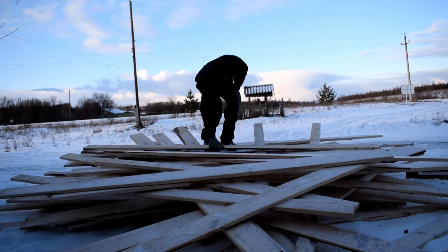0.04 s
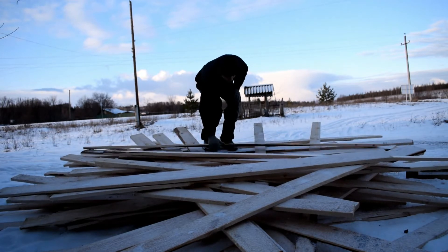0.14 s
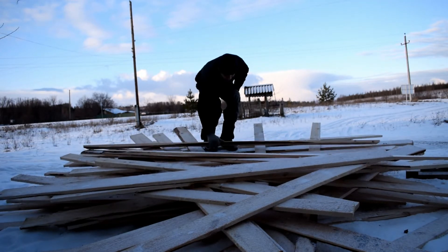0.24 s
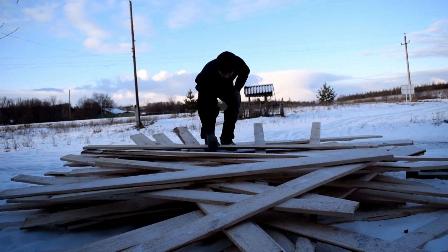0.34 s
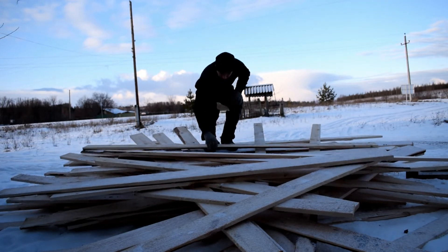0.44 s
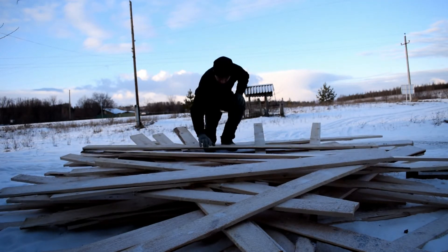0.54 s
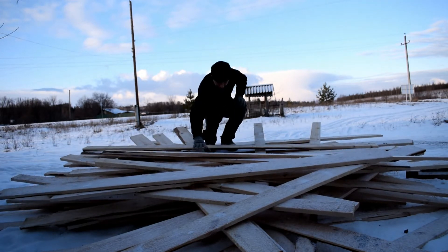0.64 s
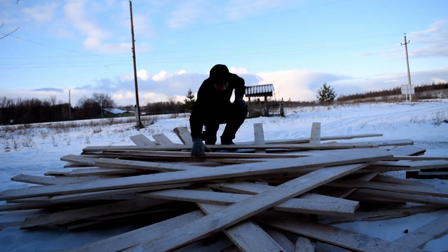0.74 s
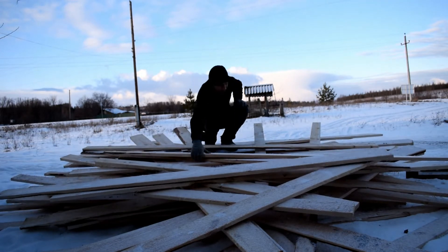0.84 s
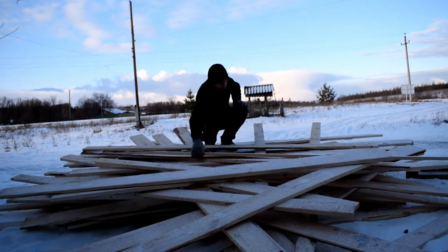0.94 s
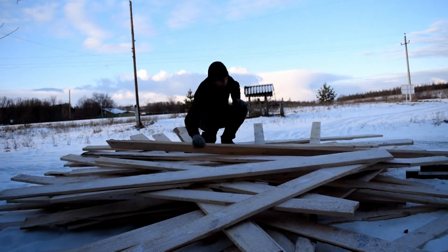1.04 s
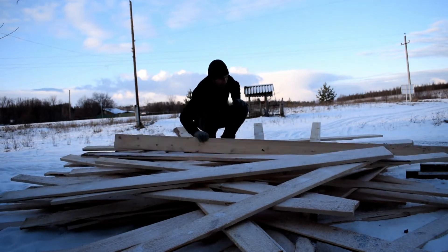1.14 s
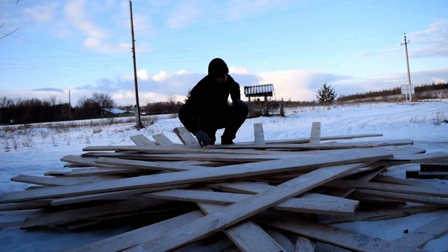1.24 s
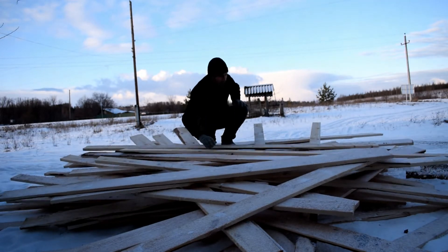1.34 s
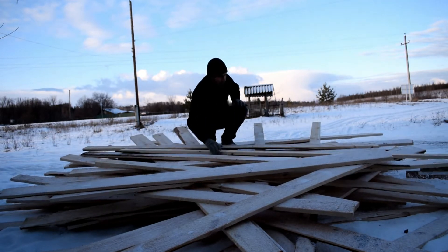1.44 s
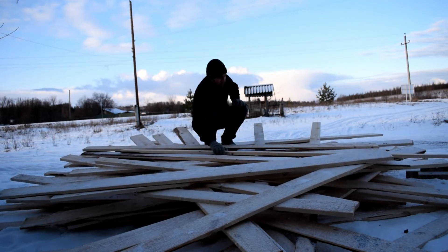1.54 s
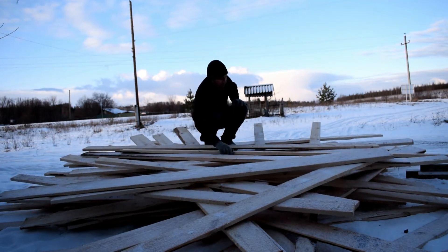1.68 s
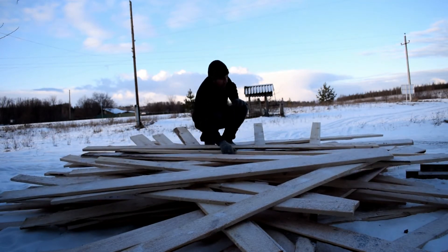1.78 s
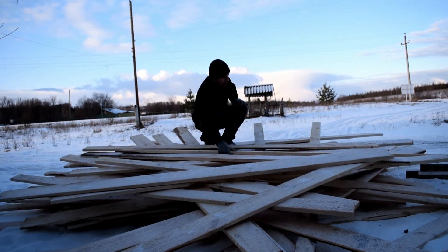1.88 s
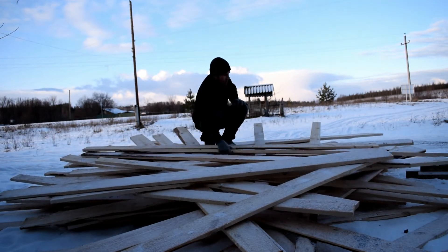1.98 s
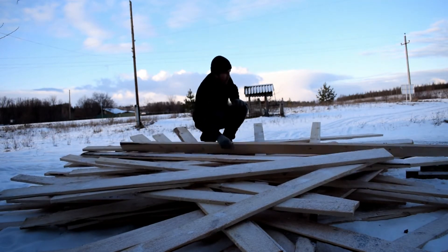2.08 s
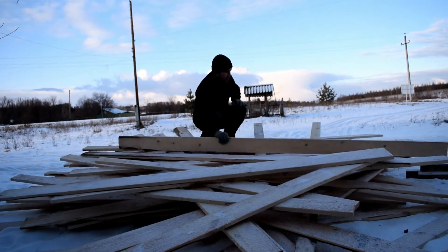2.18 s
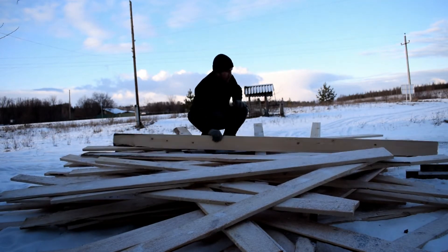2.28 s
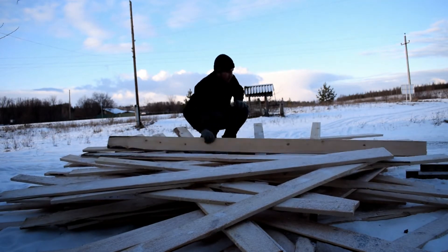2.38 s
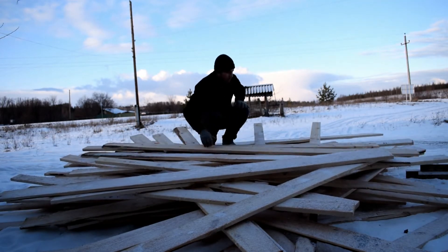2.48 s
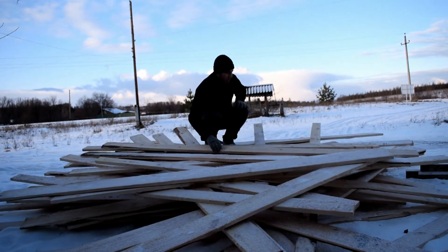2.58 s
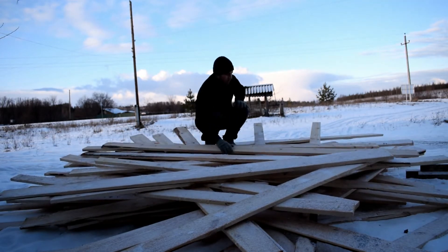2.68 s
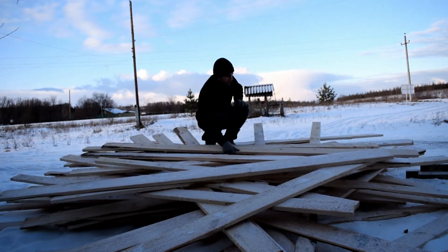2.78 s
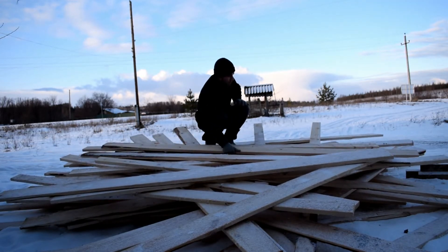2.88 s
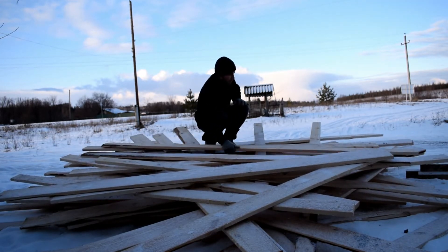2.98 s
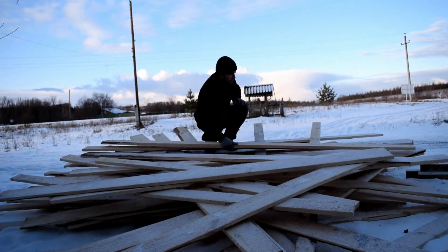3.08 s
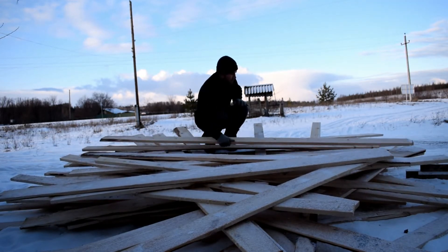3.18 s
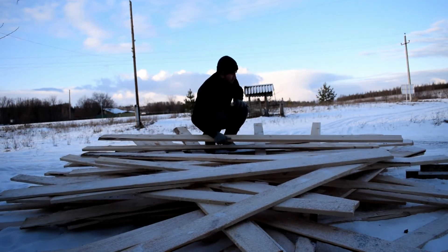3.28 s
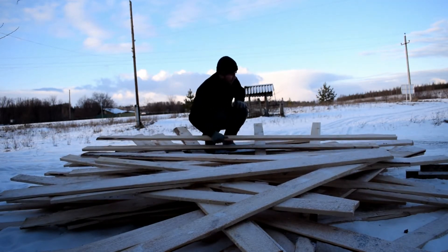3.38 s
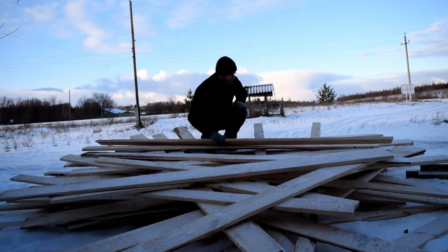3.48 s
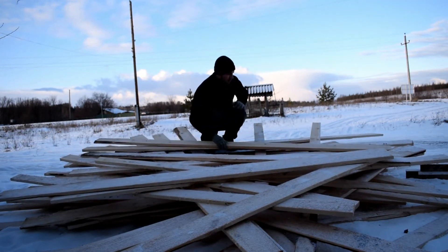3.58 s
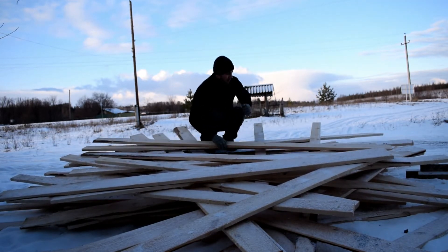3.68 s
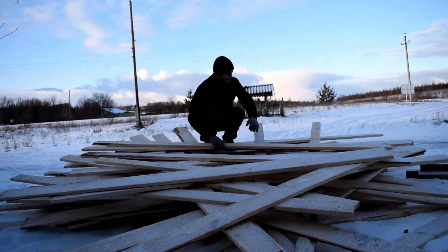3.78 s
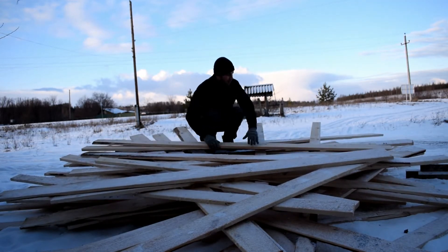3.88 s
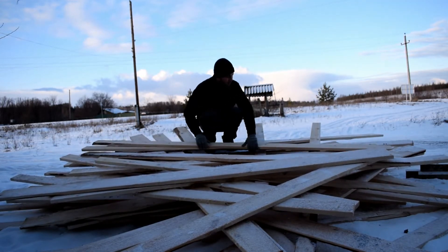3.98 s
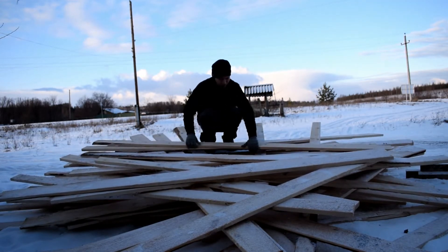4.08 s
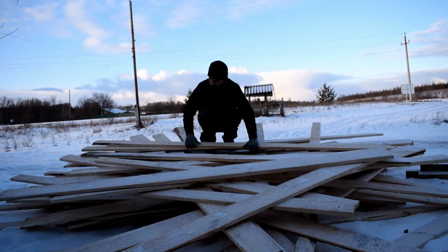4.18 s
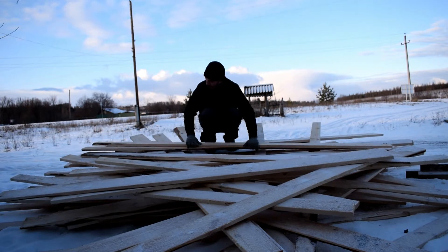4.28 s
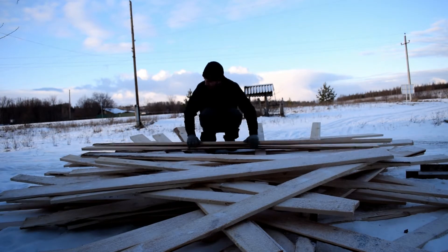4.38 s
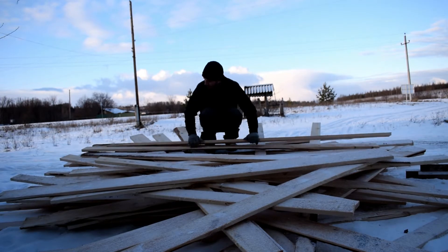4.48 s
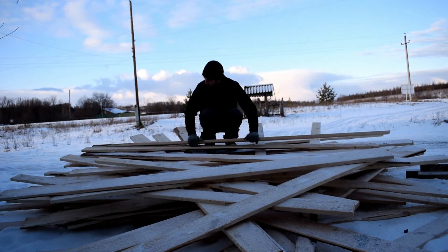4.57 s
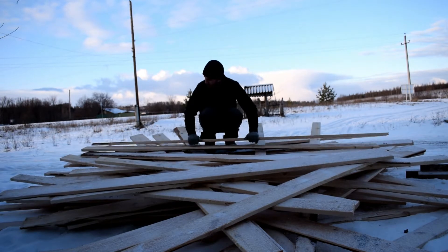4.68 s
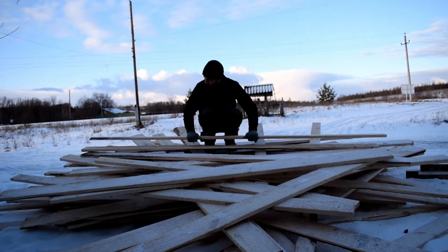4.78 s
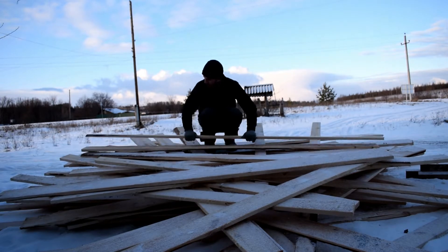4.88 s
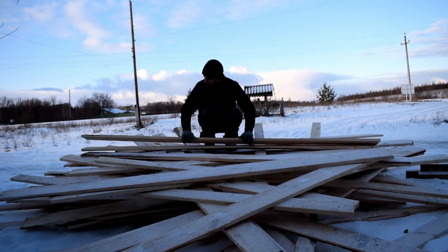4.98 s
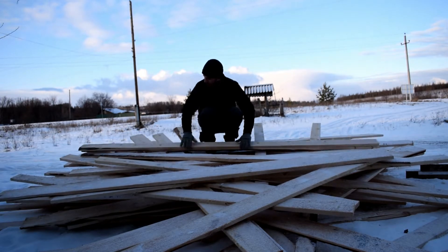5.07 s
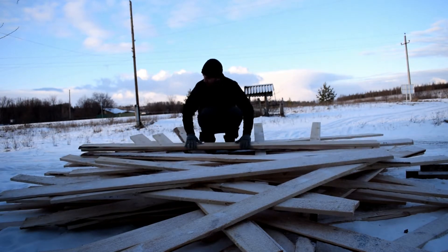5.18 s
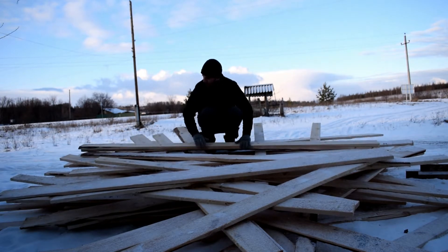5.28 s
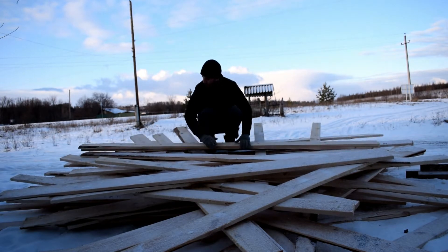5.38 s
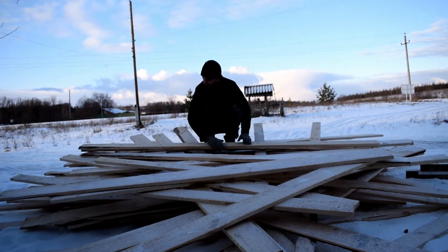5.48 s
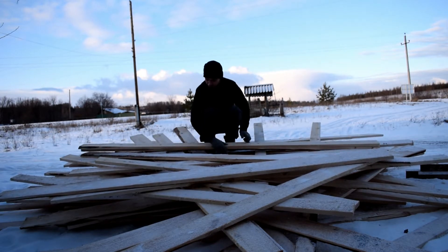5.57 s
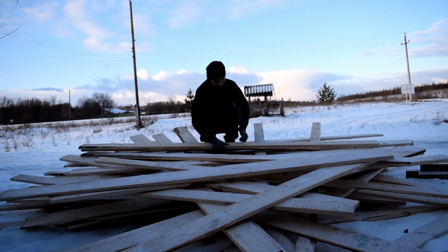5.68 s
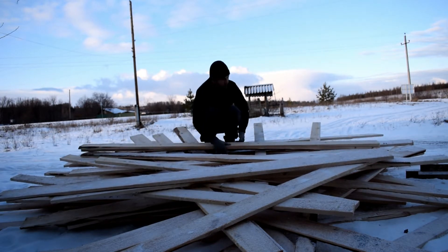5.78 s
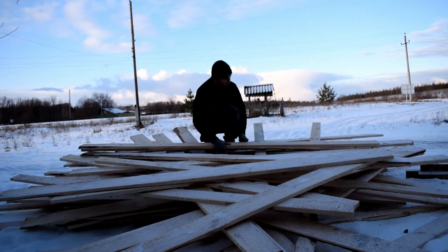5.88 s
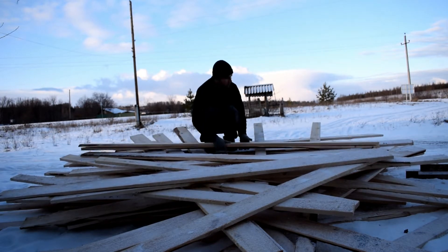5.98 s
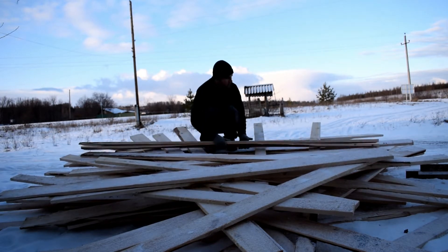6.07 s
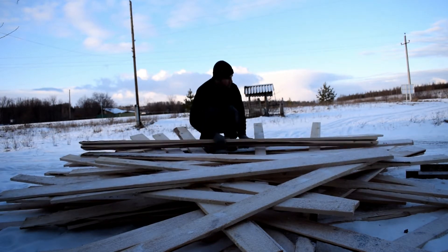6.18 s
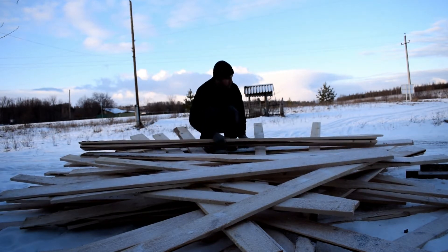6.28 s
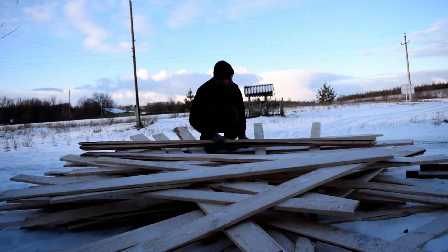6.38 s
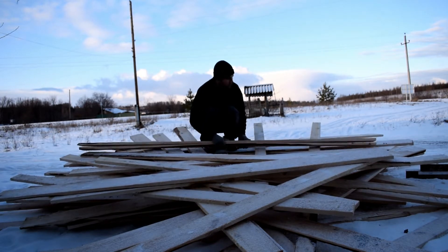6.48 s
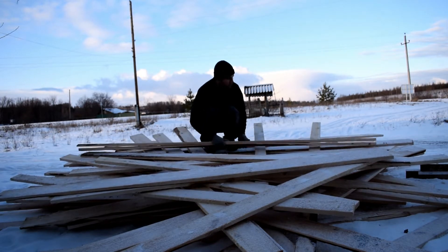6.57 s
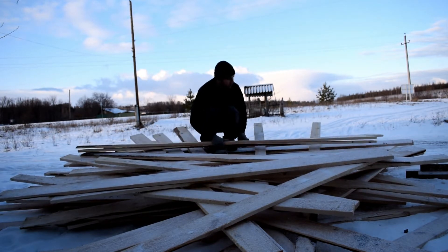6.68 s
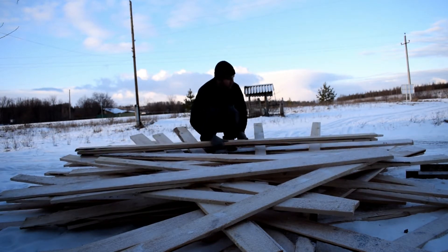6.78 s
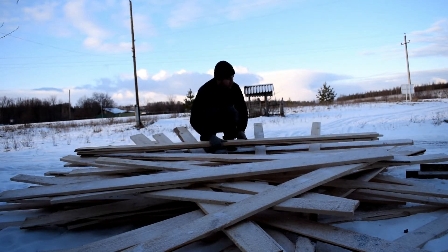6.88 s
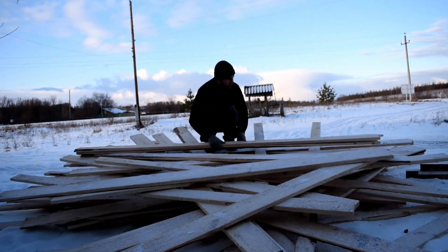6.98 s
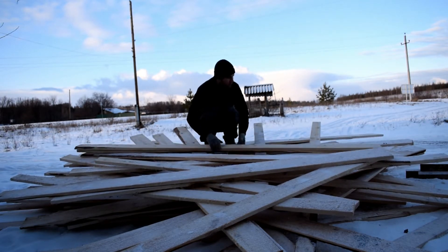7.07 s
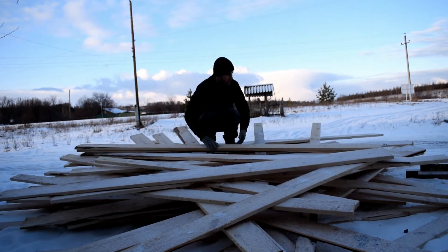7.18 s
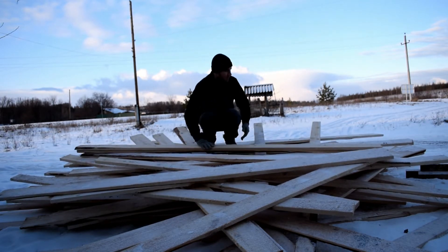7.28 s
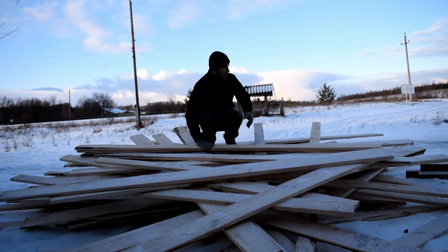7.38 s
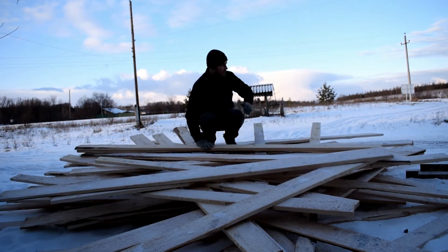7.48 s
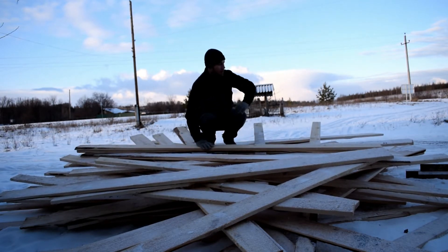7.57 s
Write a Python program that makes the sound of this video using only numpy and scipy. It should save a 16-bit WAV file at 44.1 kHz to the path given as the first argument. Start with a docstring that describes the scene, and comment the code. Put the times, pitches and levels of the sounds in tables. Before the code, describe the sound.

Sawn boards slap hard onto a loose wooden pile outdoors, clattering and rattling after each drop, with wind buffets between and a quiet stretch before the last knock.

```python
"""Sawn boards drop on a loose pile in a snowy yard: each lands, slaps and bounces, and the pile rattles on.
Boards are bursts of random contacts ringing decaying wood modes, with splintery noise for the bright edge.
Dry clicks are noise puffs; a jacket rustle and sifting snow are shaped hiss.
Wind is lumpy low noise with short thumps on the microphone; over the open field hang air hiss, an unsteady
hum and a faint far whine. The loudest slaps clip the recorder."""
import sys
import numpy as np
from scipy import signal
from scipy.fft import rfft, irfft, next_fast_len
from scipy.io import wavfile
from scipy.ndimage import uniform_filter1d, map_coordinates

SR = 44100
rng = np.random.default_rng(int(sys.argv[2]) if len(sys.argv) > 2 else 0)


def to_wav(s):
    """Save 16-bit WAV."""
    ch = np.atleast_2d(s).T  # columns
    pcm = np.round(np.clip(ch, -1, 1) * 32767)  # PCM
    wavfile.write(sys.argv[1], SR, pcm.astype(np.int16))


N = 336924

# Board contacts: start_s, level_db, high_ring_db (upper modes against middle ones),
# crack_db (against the knock), chatter_t60_s (held to 0.01-0.3 s), rise_ms
BOARD_KNOCKS = [(.003, -11.5, -5, -23, 0.11, 1.66), (0.017, -24, 13.5, -22, 0.2, 2.7),
                (.105, -23.5, -10, -32, .1, 3.7), (.16, -26.5, -24, -16, 0.08, 4.5),
                (.2, -27.5, -24, -37, 0.074, 5.6), (.244, -31, -15, -30.5, 0.045, 3),
                (.38, -22.5, -17, -22.5, .24, 6.4), (.416, -11.5, -7, -28, 0.21, 3.2),
                (.463, -14.5, 5.5, -45, .08, 8), (.518, -23.5, -19, -20, .06, 3.7),
                (.553, -16, -5, -26.5, 0.092, 1.9), (.565, -11, -11, -45, 0.14, 4.3),
                (.649, -29, -31, -14, .1, 2.2), (.689, -36, -24, -37, .06, 5),
                (.854, -33.5, -1, -28, .055, 3.9), (.89, -33.5, 8, -10, .055, 3.4),
                (1.024, -18.5, -9, -37, 0.086, 8.6), (1.097, -24, -15.5, -29.5, .06, 10),
                (1.19, -25.5, -4, -23, .11, 11), (1.31, 3, 15, -19, 0.11, 1.9),
                (1.32, 2.5, -0.5, -27.5, 0.025, 2.05), (1.33, -7, -10, -16, .18, 2.2),
                (1.375, -5.5, -3, -41, .08, 3.1), (1.42, -9.5, 3, -23.5, 0.13, 2),
                (1.478, -12, -15, -35, 0.26, 6.3), (1.507, -13.5, -0.5, -42, .06, 3.4),
                (1.518, -6, -10, -39.5, 0.089, 5.1), (1.632, -27.5, -6, -20, .1, 5),
                (1.696, -28.5, -18, -25, .064, 2.2), (1.827, -32, -18, -14, 0.071, 1.8),
                (2.212, -29, -8, -17, .07, 3), (2.417, -4, -9.5, -43.5, 0.13, 1.4),
                (2.541, 2, 12, -22, 0.16, 2.1), (2.557, -1, 5, -22.5, .11, 2.3),
                (2.577, -2, -5, -34.5, .08, 2.46), (2.627, -13, 0, -48.5, 0.12, 6.1),
                (2.728, -18.5, 2.5, -45.5, .1, 2.9), (2.78, -23, -4, -40.5, 0.058, 5),
                (2.814, -22.5, -24, -31, 0.093, 3.5), (2.854, -19, -24, -31, .1, 1.8),
                (2.956, -29.5, -20, -47, 0.14, 2), (3.18, -35, -13, -30, .09, 8),
                (3.538, -6.5, -7, -32.5, .15, 1.1), (3.56, 1.5, 11.5, -23, .1, 2.4),
                (3.597, -8, -8, -19, 0.18, 1.6), (3.614, -9.5, -3, -30.5, .065, 3),
                (3.628, -3.5, 11, -29, .09, 6), (3.654, -9, -8, -57, .08, 2.2),
                (3.672, -9, -7, -34, 0.1, 5.1), (3.704, -16, 4.5, -43, 0.035, 2.6),
                (3.76, -22.5, -16, -37.5, 0.34, 5), (3.788, -20.5, -5, -31.5, 0.34, 6.1),
                (3.836, -14, -5.5, -51, 0.052, 1.95), (4.031, -35.5, 0, -18, .11, 4.5),
                (4.075, -23, -8, -32, .04, 2.1), (4.263, -36.5, -24, -29, 0.07, 3.6),
                (4.434, -35, -12, -17.5, 0.34, 4), (4.469, -21.5, -13.5, -33, 0.13, 3),
                (4.534, -11, -3.5, -27.5, 0.15, 1), (5.023, -11.5, -8, -42, 0.19, 0.92),
                (5.091, -9.5, -20, -22, 0.1, 1), (5.123, 1, -7.5, -27.5, .1, 2.16),
                (5.138, -7, 8, -38, 0.06, 3.8), (5.223, -15.5, -4.5, -41.5, 0.064, 4.5),
                (5.245, -30, -11, -43, 0.054, 3), (5.29, -20, -4, -37.5, 0.053, 1.7),
                (5.347, -22.5, -15, -41, 0.039, 2.9), (5.444, -27, -24, -30, 0.068, 4.8),
                (5.556, -26.5, -10, -21.5, .055, 2.4), (5.689, -31, -13, -39, .053, 2.14),
                (7.109, -11, 7.5, -16.5, 0.07, 3.6), (7.12, -2.5, 2, -29, 0.09, 4.5),
                (7.15, -11, -10.5, -37.5, 0.1, 4.2), (7.243, -24.5, -10, -33, .11, 5),
                (7.262, -30.5, 4, -20, .08, 4), (7.322, -30, -2, -15, 0.13, 6.6),
                (7.52, -38, -14.5, -32, 0.049, 6)]
# Splinter noise colour: freq_hz, density_db (relative, per Hz)
CRACK_COLOUR = [(1180, -21.5), (2000, 4), (4900, -2.5), (6740, -8), (8220, -7.5), (11700, -16),
                (15700, -28)]
BODY_DB, BODY_PER_DB = -3, -0.2252  # low modes of a 0 dB knock; softer knocks sound deeper
FIRST_BLOW, SHARP_MS = 9, 1.385  # knocks that rise more slowly than SHARP_MS get a weaker first blow
DULL_HZ, DULL_S = 1200, 0.065  # later contacts are softer and lose the treble
SNAP_T60_S, GRIT_SHARE, GRIT_LUMP_DB = 0.013, .3, 4


def knocks():
    """A board does not land at once: a first blow, then a chatter of contacts along its length."""
    out = np.zeros(N)
    t = np.arange(SR // 4) / SR
    splinter = unit(hiss(CRACK_COLOUR) * amp(GRIT_LUMP_DB * wobble(250)))
    for s, db, high_db, crack_db, t60, rise_ms in BOARD_KNOCKS:
        fade = amp(-60 * t / np.clip(t60, .01, .3))
        # about 2500 random contacts a second, with a weaker 0.2 s tail under the main fade
        chatter = rng.standard_normal(len(t)) * (rng.random(len(t)) < 2500 / SR)
        contacts = chatter * (fade + .3 * amp(-60 * t / .2))
        contacts *= 1 - np.exp(-1000 * t / max(rise_ms, .3))
        soft = signal.lfilter(*signal.butter(2, DULL_HZ, fs=SR), contacts)
        contacts = soft + (contacts - soft) * np.exp(-t / DULL_S)
        contacts[0] = FIRST_BLOW * min(1, SHARP_MS / max(rise_ms, .3)) ** 2
        sound = signal.fftconvolve(contacts, ring(BODY_DB + BODY_PER_DB * db, high_db))
        opening_rms = np.sqrt(np.mean(sound[:SR // 40] ** 2))
        add(out, s, amp(db) * 0.41 * sound / opening_rms)
        # splinters and grit give the bright edge
        snap = amp(-60 * t / SNAP_T60_S) + GRIT_SHARE * fade
        snap *= 1 - np.exp(-1000 * t / max(rise_ms / 2, .5))
        grit = splinter[rng.integers(N - SR):][:len(t)]
        add(out, s, amp(db + crack_db) * snap * grit)
    # narrow boards radiate little deep bass
    return filtered(out, lambda hz: (1j * hz / (70 + 1j * hz)) ** 2)


# Wood modes: pitch_hz (before a random detune), level_db (relative, before tilt and random spread),
# t60_s (capped shorter, most of all for high modes)
WOOD_MODES = [(99, -15.5, .15), (151, -14, 0.14), (203, -13.5, .1), (281.8, -14, 0.13), (378.6, -5, 0.15),
              (439.7, -5, 0.13), (499, -7.5, 0.062), (546, 2.5, 0.039), (579.2, -3.5, 0.079),
              (682, -10, 0.11), (755.3, -4.5, 0.069), (811.7, -5.5, 0.098), (897, 1.5, 0.071),
              (967.4, -5, 0.042), (1058, 1.5, 0.027), (1252, -1, 0.074), (1394, -5.5, .07),
              (1503, -12, 0.04), (1700, -9.5, 0.048), (1761, -18.5, .06), (1903, -14, 0.081),
              (2051, -13.5, 0.057), (2246, -19, 0.055), (2490, -14, 0.12), (2976, -21, 0.029),
              (3220, -23, 0.034), (3417, -19.5, 0.035), (4083, -34.5, 0.024)]


def ring(low_db, high_db):
    """The wood's answer to one tap: several boards sound at once, each cut and struck a little differently."""
    hz, db, t60 = np.repeat(np.transpose(WOOD_MODES), 4, axis=1)[:, :, None]
    t = np.arange(SR // 10) / SR
    draw = rng.standard_normal((len(hz), 3))
    detune, spread, side = draw[:, :1], draw[:, 1:2], draw[:, 2:]
    tilt_db = np.interp(np.log(hz), np.log([330, 650, 1600]), [low_db, 0, high_db])
    tone = np.sin(2 * np.pi * hz * (1 + .07 * detune) * t) * np.sign(side + .4)
    level_db = db + tilt_db + 3 * spread
    # high modes of wood die first
    longest = np.clip(45 / hz, .008, .06)
    modes = amp(level_db - 60 * t / np.minimum(t60, longest)) * tone
    return np.sum(modes, axis=0) * (1 - np.exp(-t / .0003))


# After a 0 dB knock, before the settling curve; at rest; deep sway after a 0 dB knock
RATTLE_DB, RATTLE_REST_DB, SWAY_DB = -22, -59.5, -28.5


def rattle():
    """Many tiny random contacts inside the pile keep the wood murmuring; the whole pile sways deeply under it."""
    out = np.zeros(N)
    moving = settling()
    for _ in range(6):
        taps = (rng.random(N) < 150 / SR) * rng.standard_normal(N) * amp(1 * wobble(25))
        out += signal.fftconvolve(taps, ring(low_db=9.5, high_db=-5.5))[:N]
    murmur = np.hypot(amp(RATTLE_DB) * moving, amp(RATTLE_REST_DB)) * unit(out)
    return murmur + amp(SWAY_DB) * moving * hiss(BUFFET_COLOUR)


SETTLE_RISE_S, SETTLE_T60_S = 0.056, 0.61


def settling():
    """How much the pile still moves: every knock adds energy that swells and dies away."""
    energy = np.zeros(N)
    t = np.arange(SR) / SR
    shape = (1 - np.exp(-t / SETTLE_RISE_S)) * amp(-60 * t / SETTLE_T60_S)
    for s, db, *_ in BOARD_KNOCKS:
        add(energy, s, (amp(db) * shape) ** 2)
    return np.sqrt(energy)


# Small dry clicks and scuffs: start_s, level_db, centre_hz, t60_s
DRY_TICKS = [(0.321, -46.5, 3000, 0.023), (.652, -40.5, 2600, 0.065), (2.526, -29, 1318, 0.18),
             (3.063, -51.5, 2460, .09), (3.155, -50, 1570, 0.064), (4.143, -44.5, 2055, .08),
             (4.696, -49, 1930, 0.13), (6.057, -44.5, 1940, 0.058), (6.137, -49.5, 2530, 0.088),
             (6.222, -51, 9980, .009), (6.255, -44, 10100, 0.0077), (6.417, -54.5, 9000, 0.0092),
             (7.568, -47, 2890, 0.084)]


def ticks():
    """Short decaying puffs of noise around a centre frequency."""
    out = np.zeros(N)
    t = np.arange(SR // 10) / SR
    for s, db, centre_hz, t60 in DRY_TICKS:
        band = lambda hz: np.exp(-(np.log((hz + 1) / centre_hz) / 0.58) ** 2)
        puff = unit(filtered(rng.standard_normal(len(t)), band))
        add(out, s, amp(db - 60 * t / np.clip(t60, .003, .2)) * puff)
    return out


# The worker's moves: start_s, end_s, level_db
JACKET_MOVES = [(0.263, 0.86, -57), (1.002, 1.355, -54.5), (1.594, 1.81, -57.5), (2.096, 2.243, -56.5),
                (2.262, 2.557, -56), (3.756, 4.29, -58.5), (4.31, 4.8, -72), (5.266, 5.715, -56.5),
                (5.86, 6.02, -57.5), (6.06, 6.3, -77), (6.75, 7.18, -61.5), (7.206, 7.422, -56)]
# Cloth and snow hiss colour: freq_hz, density_db (relative, per Hz)
CLOTH_COLOUR = [(880, -24.5), (1500, 1), (2200, -3.5), (2870, -3), (4170, -8), (10500, -15.5),
                (15700, -31.5)]
# Hiss at rest; snow sifting after a 0 dB knock, before the settling curve
MOVE_FADE_S, STILL_DB, SIFT_DB = 0.058, -61.5, -49


def rustle():
    """Cloth hisses with each move; snow sifts while the pile settles."""
    power = amp(STILL_DB) ** 2 + (amp(SIFT_DB) * settling()) ** 2
    for start, end, db in JACKET_MOVES:
        power += (amp(db) * swell(start, end, MOVE_FADE_S)) ** 2
    return np.sqrt(power) * amp(1.5 * wobble(30)) * hiss(CLOTH_COLOUR, patchy_db=1)


# Wind strength: time_s, buffet_db
WIND_LEVEL = [(0, -27), (.35, -58.5), (.6, -37.5), (1.15, -35.5), (1.7, -54.5), (2.15, -42.5), (2.4, -43.5),
              (3.1, -47.5), (3.45, -53.5), (4.5, -51), (4.8, -57), (6.1, -65), (6.47, -45.5), (6.64, -51),
              (6.85, -64), (7.64, -33)]
# Buffeting colour, also used for the pile's sway: freq_hz, density_db (relative, per Hz)
BUFFET_COLOUR = [(8.8, -37), (15, -14.5), (59, -2.5), (103, -2.5), (210, -8), (326, -20.5), (400, -17.5),
                 (520, -48.5), (880, -120)]
# Single wind thumps: time_s, level_db, pitch_hz
WIND_THUMPS = [(.499, -17, 131), (0.519, -19.5, 114), (0.648, -24, 72), (0.817, -19, 90), (0.856, -20, 75),
               (0.891, -21, 56), (0.939, -20, 108), (1.998, -23.5, 71.4), (2.146, -26, 99),
               (2.327, -31, 88.6), (6.298, -22.5, 69.5), (6.368, -27.5, 64.4), (6.41, -28, 100),
               (6.434, -24.5, 110), (6.501, -22.5, 165.3), (6.506, -24, 73), (6.523, -26, 96),
               (6.543, -32, 130), (6.575, -16.5, 115), (7.489, -24.5, 86.2), (7.616, -13, 112)]
THUMP_CYCLES = 0.38  # from the thump's centre to 1/e


def wind():
    """Lumpy buffeting on the microphone port, with short pressure thumps on top."""
    lumps = amp(4.5 * wobble(18))
    out = amp(curves(WIND_LEVEL)[0]) * unit(lumps * hiss(BUFFET_COLOUR))
    for s, db, hz in WIND_THUMPS:
        cycles = np.arange(round(3 * SR / hz)) / SR * hz - 1.5
        thump = np.sin(2 * np.pi * cycles - .3) * np.exp(-(cycles / THUMP_CYCLES) ** 2)
        # the thump's centre falls 4 ms after its listed time
        add(out, s + .004 - 1.5 / hz, amp(db) * thump)
    return out


# Hum strength: time_s, level_db
HUM_LEVEL = [(0, -56.5), (3, -54), (5, -57.5), (6, -56.5), (7.64, -54)]


def hum():
    """A low tone around 100 Hz, unsteady in pitch and strength."""
    phase, size = wavering(np.full(N, 100.), spread=0.035, rate=110)
    return amp(curves(HUM_LEVEL)[0]) * size * np.sin(phase)


# The whine comes and goes: start_s, end_s, pitch_hz (mean), level_db
FAR_WHINE = [(1.597, 2.41, 807, -59), (2.397, 3.513, 830, -61), (4.66, 5.6, 834, -56)]
WHINE_FADE_S = 0.033


def whine():
    """A far unsteady tone with one overtone, fading in and out."""
    out = np.zeros(N)
    for start, end, hz, db in FAR_WHINE:
        phase, size = wavering(np.full(N, hz), spread=.022, rate=70)
        tone = np.sin(phase) + amp(-10) * np.sin(2 * phase)
        out += amp(db) * swell(start, end, WHINE_FADE_S) * size * tone
    return out


# Field air colour: freq_hz, density_db (relative, per Hz)
AIR_COLOUR = [(15, -43.5), (25, -2), (102, 3.5), (123, -9), (152, -14.5), (585, -10), (877, -11.5),
              (1420, -14.5), (2190, -38.5), (3370, -36), (4070, -38), (10500, -40), (15700, -45)]
AIR_DB = -54.5


def field_air():
    """Steady, slightly patchy noise of the open field, weighted to the bass."""
    return amp(AIR_DB) * hiss(AIR_COLOUR, patchy_db=.7)


def wavering(hz, spread, rate):
    """Phase and size of a tone whose pitch and strength are unsteady."""
    phase = 2 * np.pi * np.cumsum(hz * (1 + spread * wobble(rate))) / SR
    return phase, np.sqrt(2) * unit(amp(3.5 * wobble(rate / 2)))


def hiss(spectrum, patchy_db=0):
    """Coloured noise of rms 1 with patches of random gain across time and frequency."""
    f, db = np.transpose(spectrum)
    z = signal.stft(rng.standard_normal(N), nperseg=512)[2]
    patches = uniform_filter1d(rng.standard_normal(z.shape), size=6, axis=0)
    patches = uniform_filter1d(patches, size=10, axis=1)
    x = signal.istft(z * amp(patchy_db * unit(patches)), nperseg=512)[1][:N]
    return unit(filtered(x, lambda hz: amp(np.interp(np.log(hz + 1), np.log(f + 1), db))))


def swell(start, end, fade_s):
    """Fades in, holds, fades out."""
    t = np.arange(N) / SR
    return np.clip(np.minimum(t - start, end - t) / fade_s, 0, 1)


def wobble(rate):
    """A smooth random curve, rate knots a second."""
    knots = rng.standard_normal(int(N * rate / SR) + 4)
    return map_coordinates(knots, [np.arange(N) * rate / SR])


def curves(rows):
    """One value per sample for each column after the time."""
    s, *cols = np.transpose(rows)
    return [np.interp(np.arange(N) / SR, s, c) for c in cols]


def filtered(x, response):
    """x times a response of frequency."""
    m = next_fast_len(len(x) + 8192)
    return irfft(rfft(x, m) * response(np.fft.rfftfreq(m, 1 / SR)), m)[:len(x)]


def add(track, s, sound):
    """Mixes a sound in at time s."""
    start = max(round(s * SR), 0)
    track[start:start + len(sound)] += sound[:len(track) - start]


def amp(db):
    """dB to gain."""
    return 10 ** (np.asarray(db) / 20)


def unit(x):
    """Scaled to rms 1."""
    return x / np.sqrt(np.mean(x ** 2) + 1e-20)


def scene():
    """All sources, one microphone."""
    pile = knocks() + rattle() + ticks()
    background = rustle() + wind() + field_air() + hum() + whine()
    return (pile + background)[None]


TOP_HZ = 15830


def record(dry):
    """The microphone loses deep bass, the input stage clips near full scale, nothing is kept above the band limit."""
    heard = filtered(dry[0], lambda hz: 1j * hz / (40 + 1j * hz))
    clipped = heard / (1 + np.abs(heard / 1.02) ** 5) ** (1 / 5)
    return filtered(clipped, lambda hz: hz < TOP_HZ)[None]


dry = scene()
out = record(dry)
to_wav(out)
```